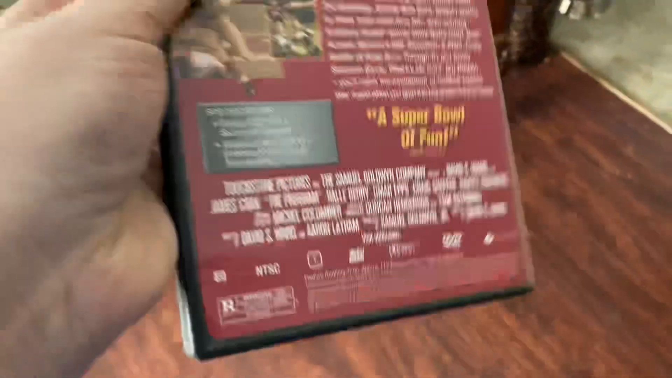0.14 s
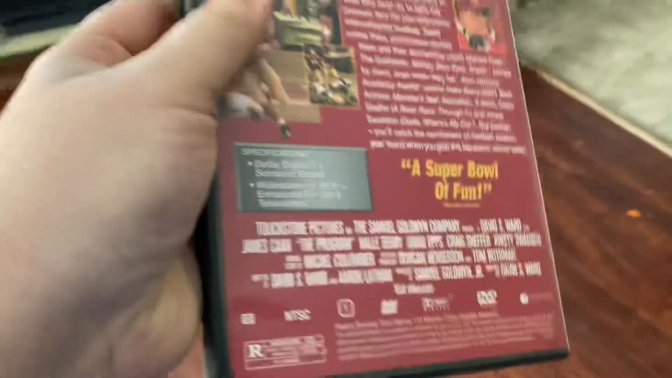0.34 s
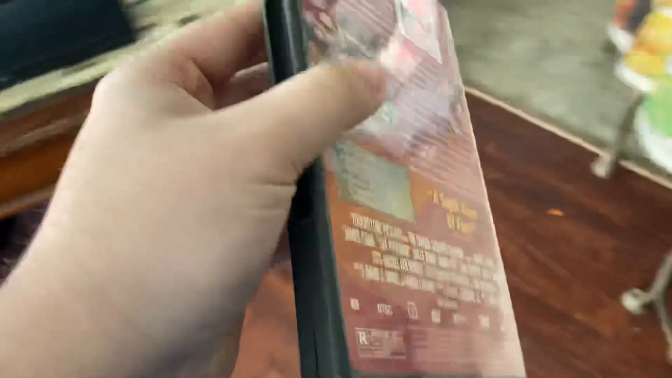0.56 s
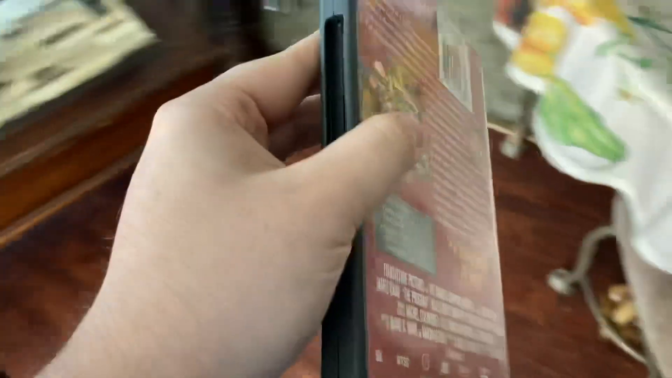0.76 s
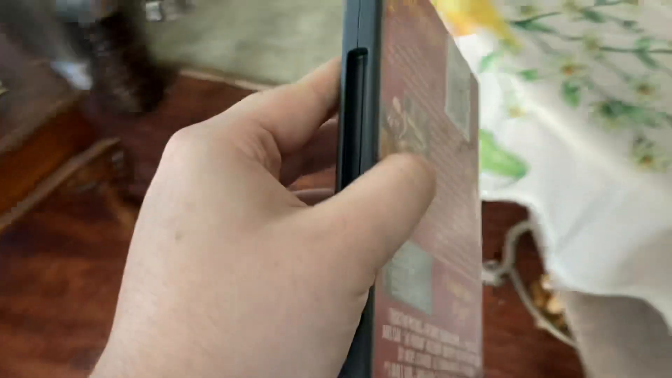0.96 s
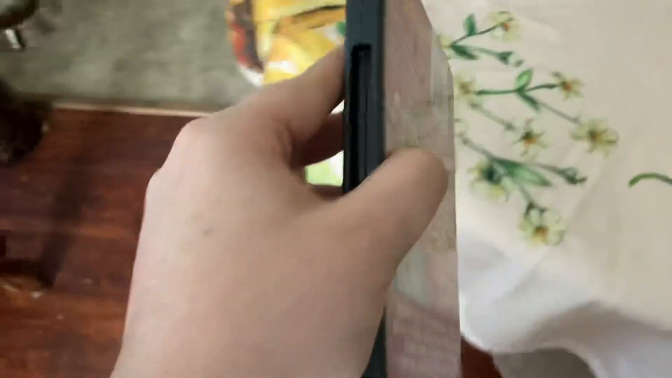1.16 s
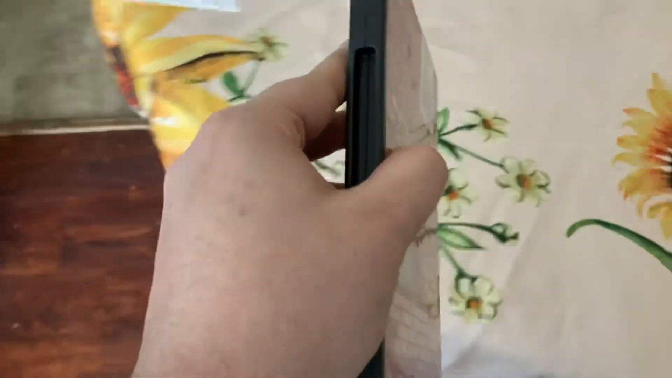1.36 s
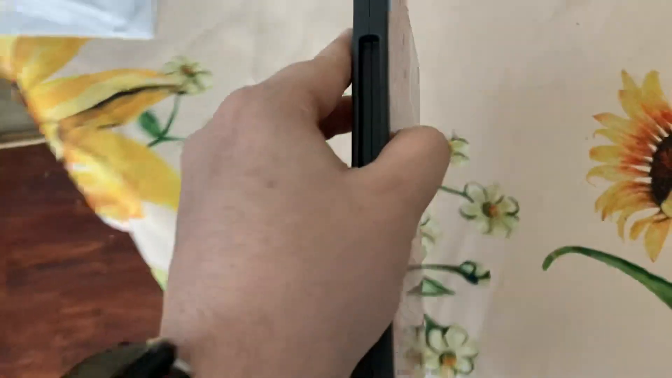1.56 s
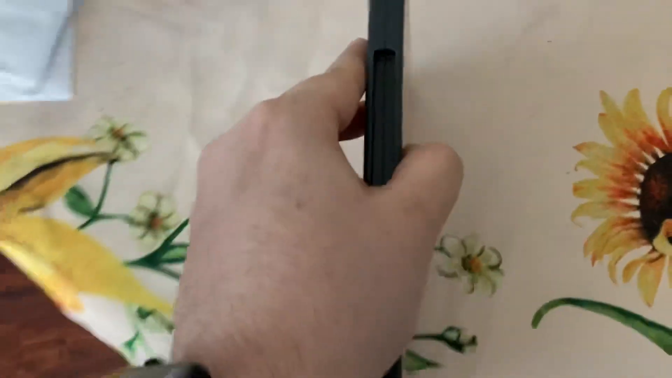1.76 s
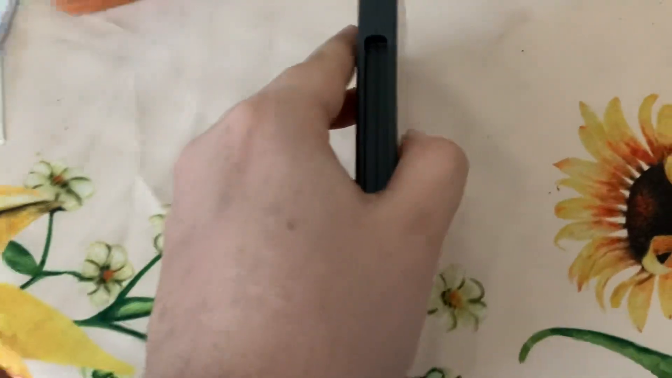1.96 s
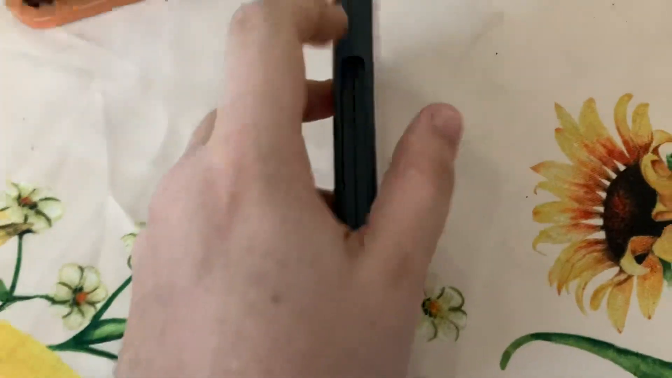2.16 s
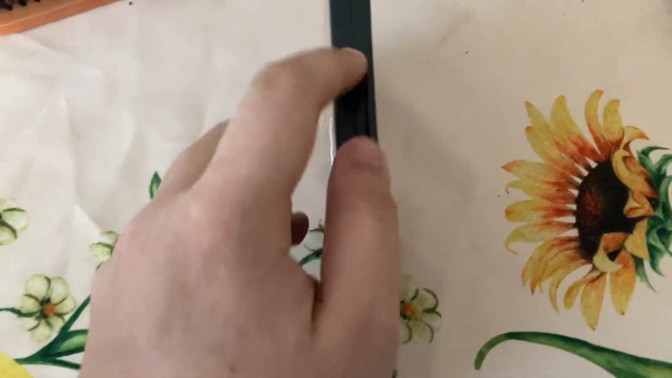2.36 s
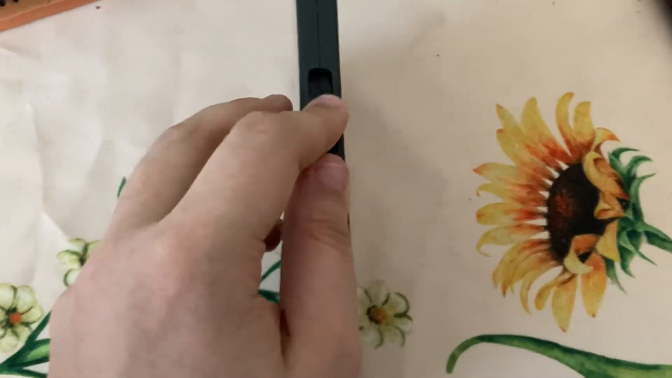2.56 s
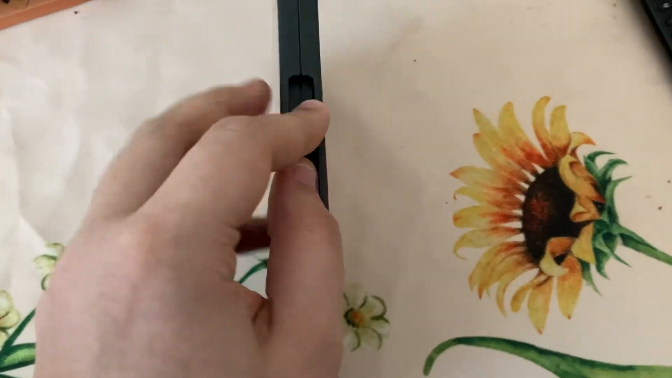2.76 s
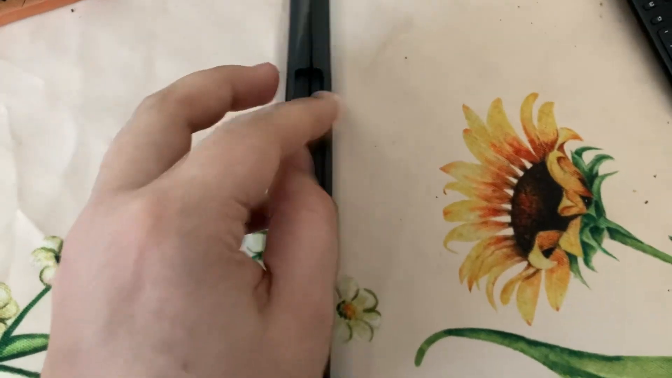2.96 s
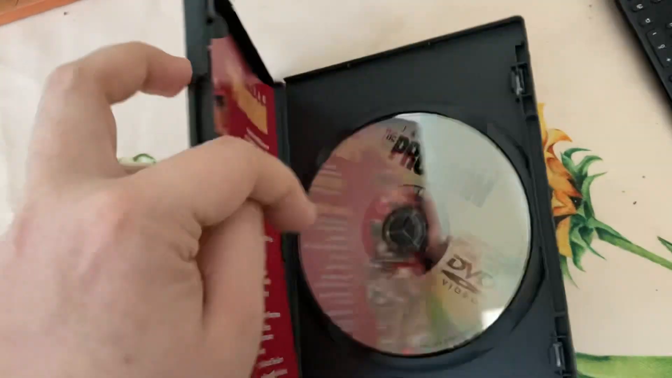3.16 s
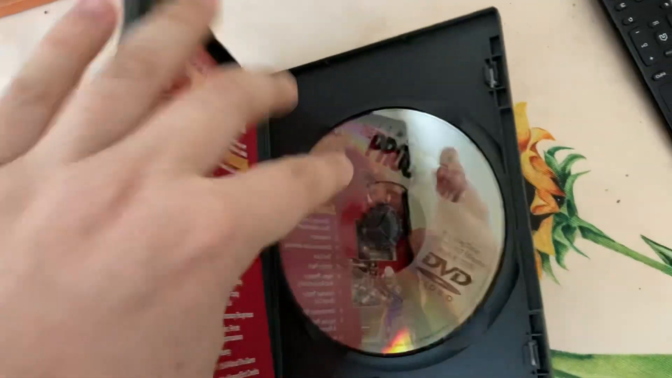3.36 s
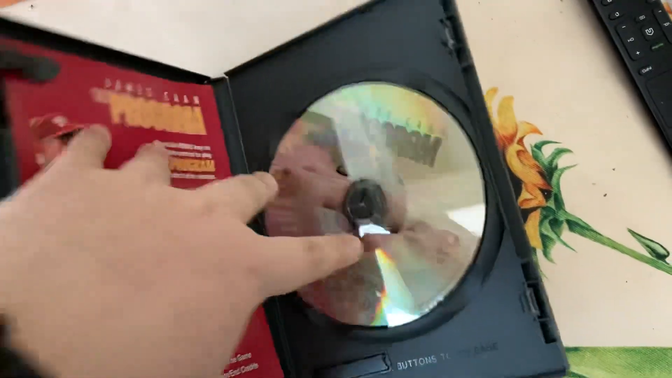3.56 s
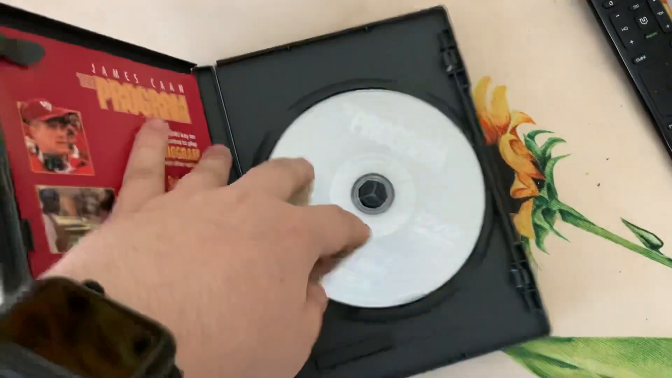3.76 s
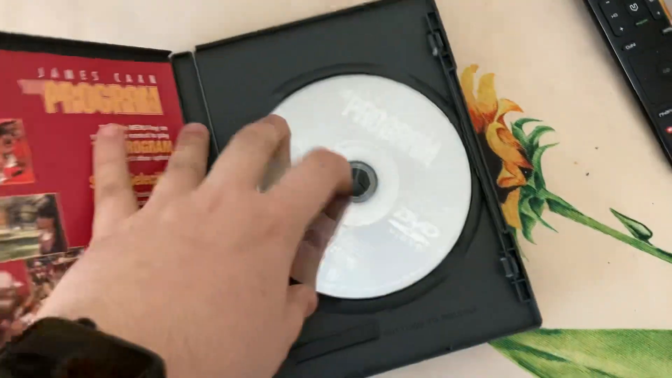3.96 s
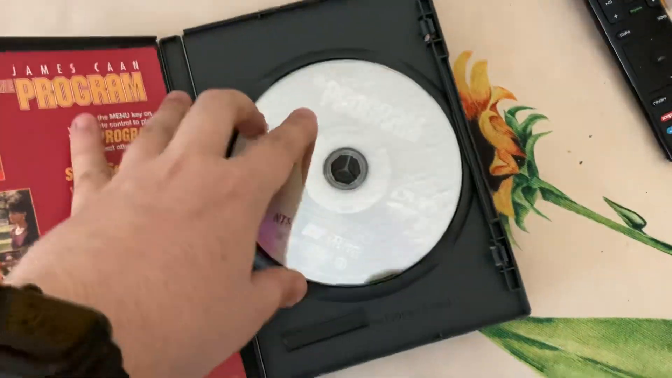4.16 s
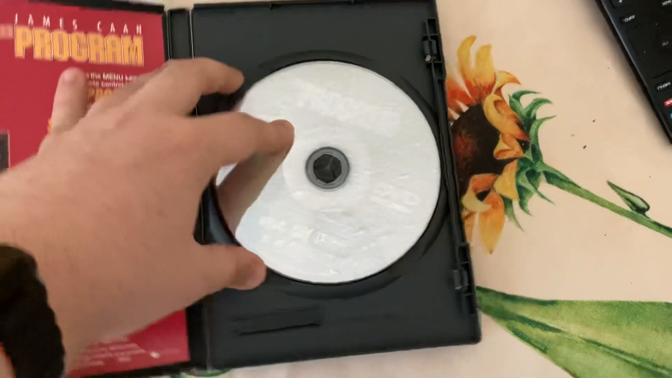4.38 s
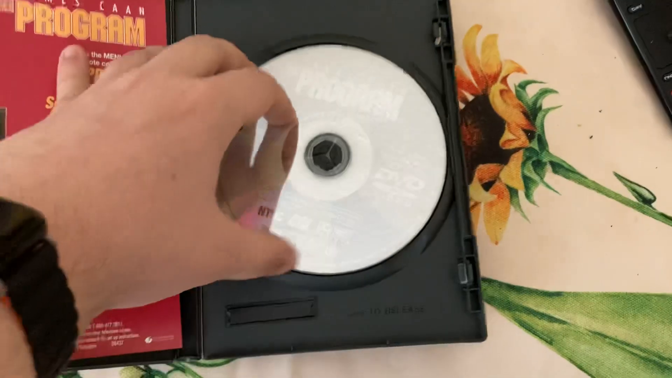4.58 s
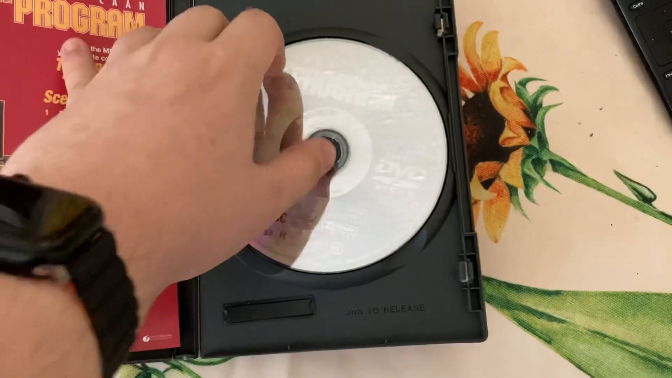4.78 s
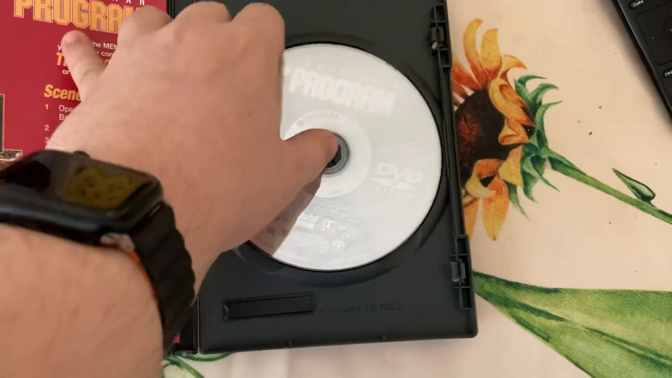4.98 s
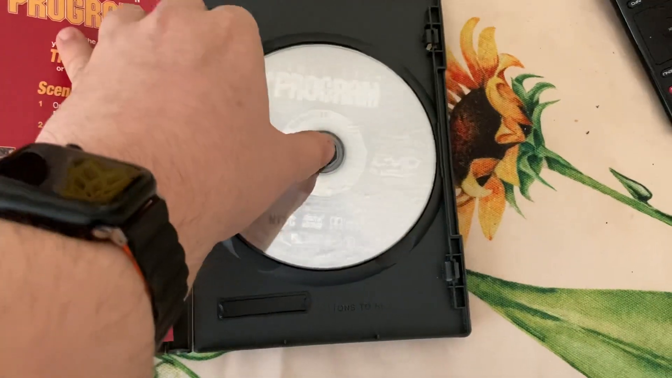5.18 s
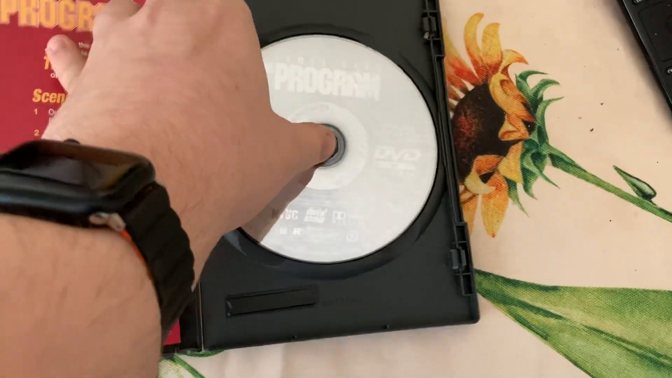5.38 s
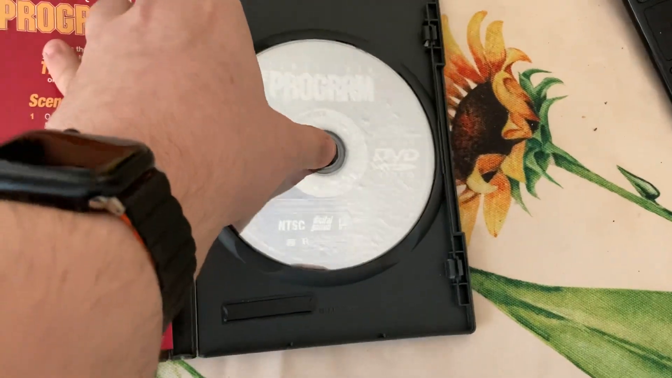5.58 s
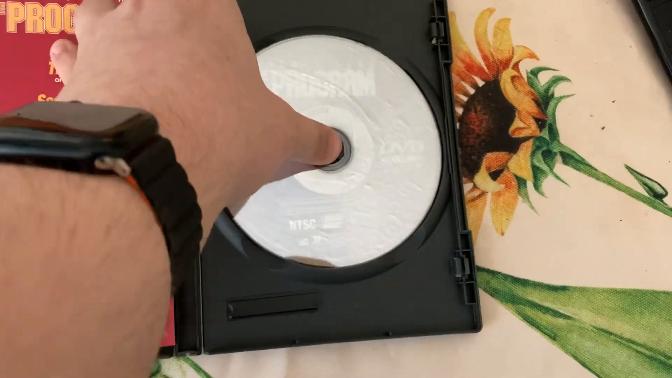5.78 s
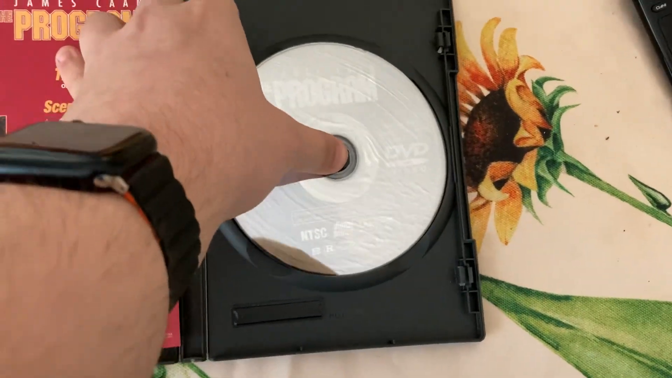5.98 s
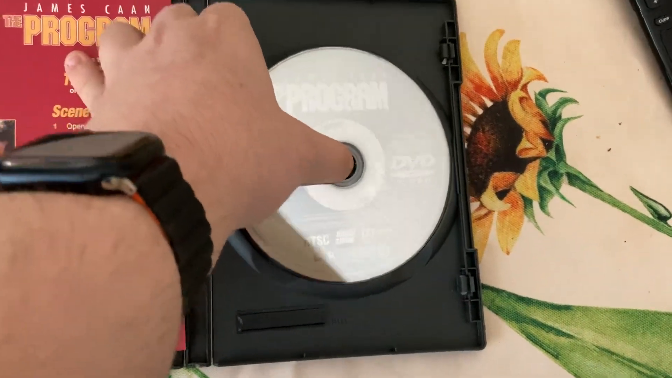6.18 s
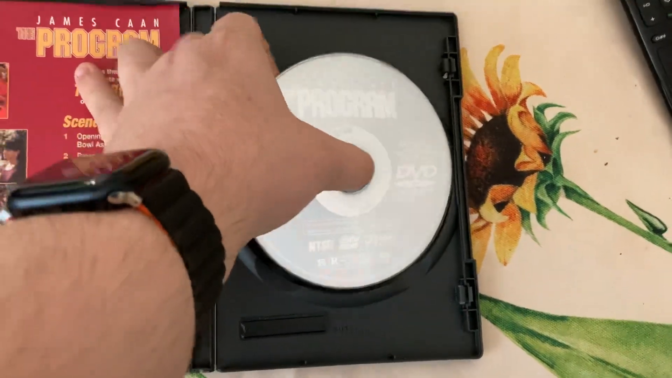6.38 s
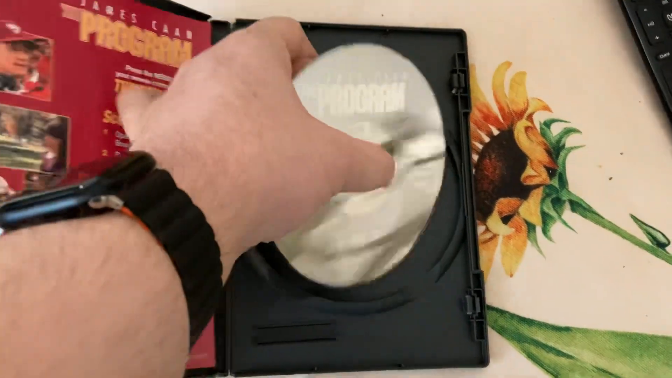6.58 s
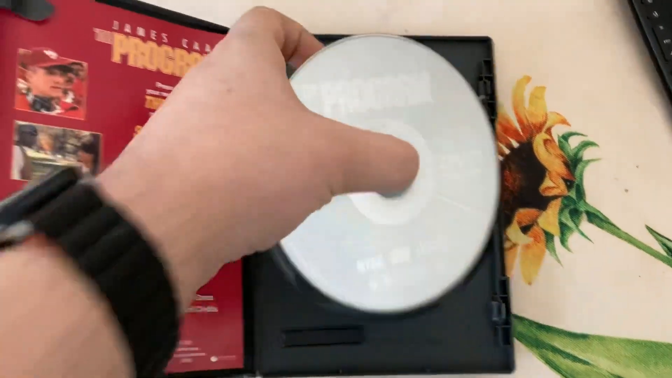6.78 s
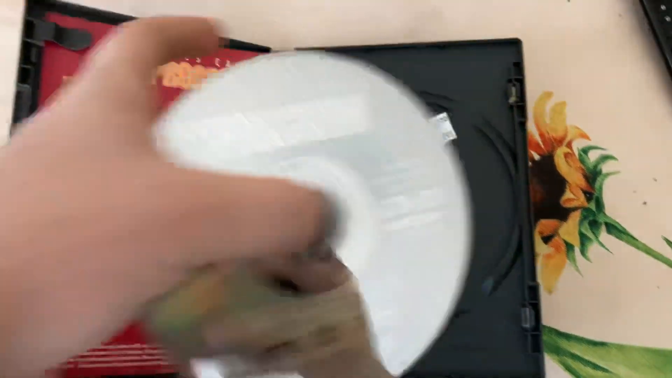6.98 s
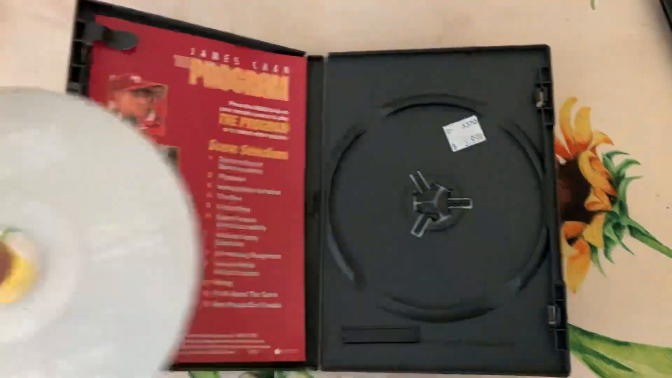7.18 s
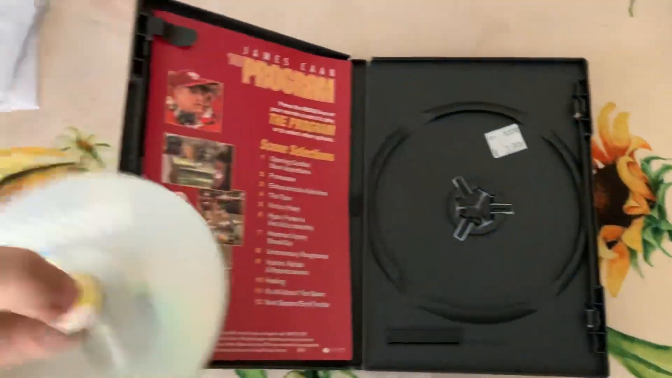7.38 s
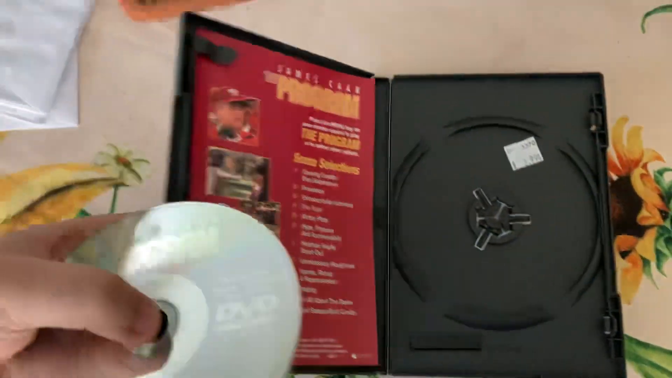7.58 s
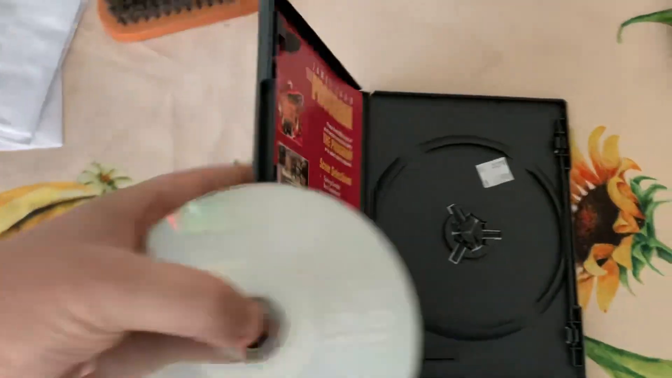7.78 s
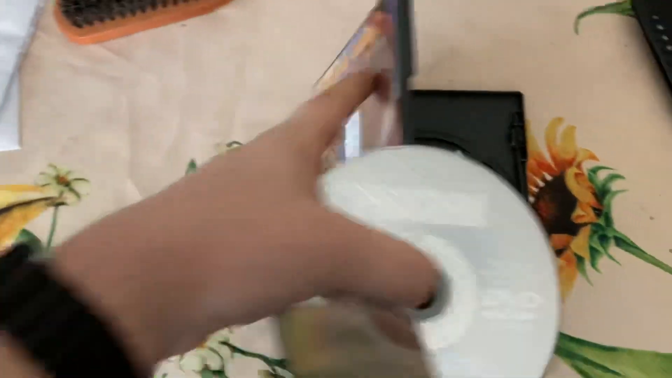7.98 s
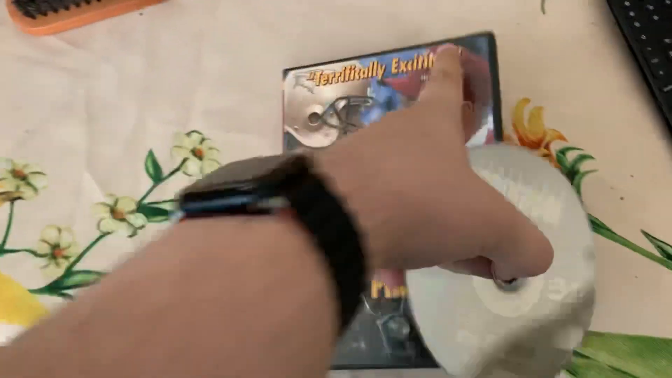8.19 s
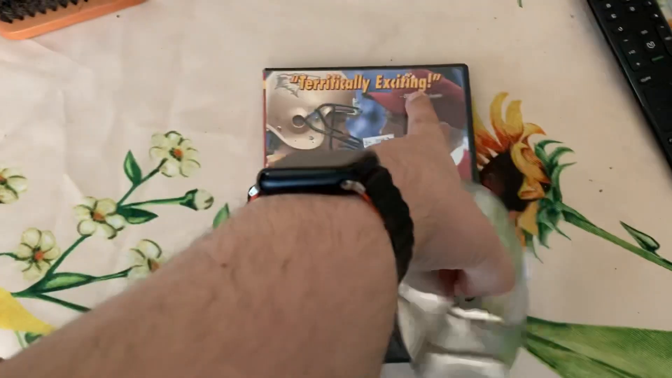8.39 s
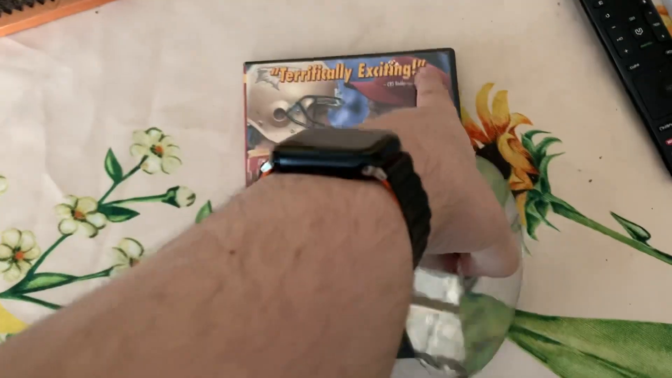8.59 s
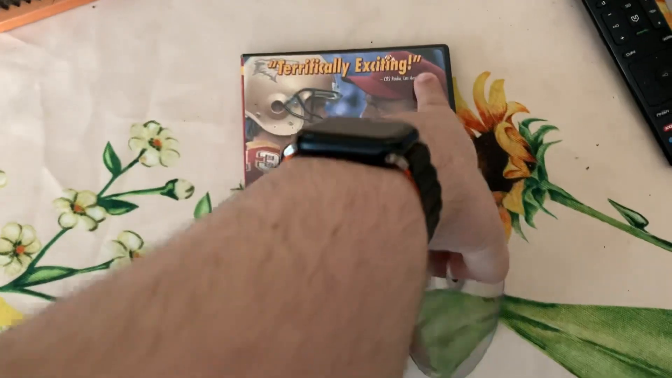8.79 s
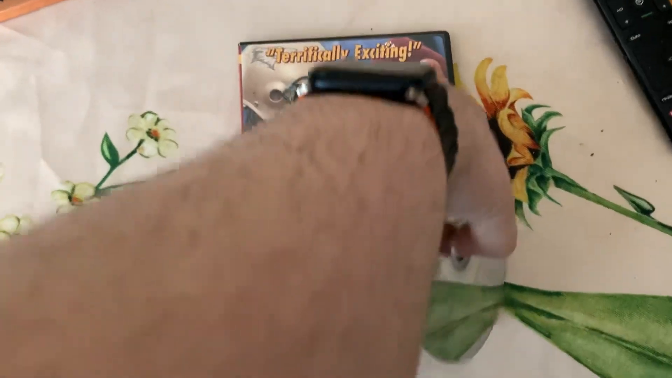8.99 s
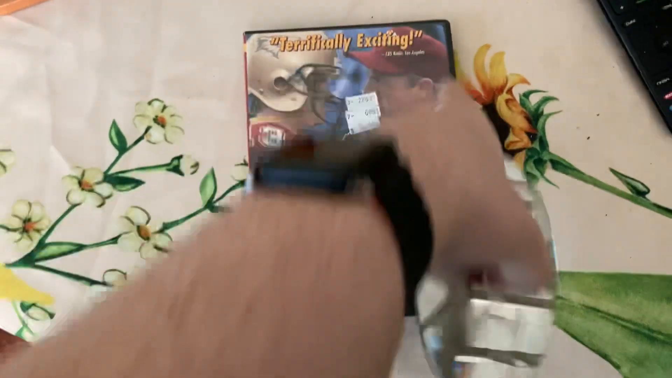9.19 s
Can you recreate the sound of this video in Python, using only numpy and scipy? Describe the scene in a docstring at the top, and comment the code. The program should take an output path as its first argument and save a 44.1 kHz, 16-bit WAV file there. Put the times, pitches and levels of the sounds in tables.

```python
"""A disc case opened and shut

Hands turn a plastic disc case, slide it onto a tablecloth and snap it open in a small, live room.
A thumb presses the hub until its prongs click and the disc springs free; the disc is lifted out,
the lid falls back and is pressed shut with a loud clap. Skin rubs and plastic creaks in between.
Snaps are noise cracks with ringing modes; friction is trains of slips sent through resonances."""
import sys
import numpy as np
from scipy import signal
from scipy.fft import rfft, irfft, next_fast_len
from scipy.io import wavfile
from scipy.ndimage import uniform_filter1d

SR = 44100
rng = np.random.default_rng(int(sys.argv[2]) if len(sys.argv) > 2 else 0)


def unload_wav(signal):
    """Save mono or channel-first audio to the path in sys.argv[1] as 16-bit WAV at rate SR, clipped to [-1, 1]."""
    wavfile.write(
        sys.argv[1],
        SR,
        np.round(np.clip(np.atleast_2d(signal).T, -1, 1) * 32767).astype(np.int16),
    )


N = 407484
TIME = np.arange(N) / SR

# edges of the bands of a blow, in order thump, shell, panel, edge, crack: f/Hz
BLOW_BAND_EDGES = [50, 280, 800, 2400, 6000, 17000]
# resonances of the case: f/Hz, width/Hz, level over the plain plastic/dB
SHELL_MODES = [(442, 50, 14.5), (525, 180, 12.5), (830, 69, 1), (1080, 620, 13.5), (1640, 66, 11.5),
               (1790, 97, 8.5), (2800, 350, 4.5), (4340, 330, 5), (7530, 2000, 3.5), (9800, 4100, 3.5)]
# prongs of the hub slipping past the disc: t/s, crack T60 at 2 kHz/s, part, relative ring level/dB,
# thump f/Hz, thump level/dB, crack level/dB, brightness/(dB per octave)
PRONG_CLICKS = [ (5.7314, .026, "first prong", -33.5, 105.5, -61.5, -40.5, 0.92),
                (5.8084, .017, "second prong", -29.5, 108.8, -46.5, -28.5, 0.56),
                (5.8224, .013, "second prong", -34, 163, -55.5, -32, 1),
                (6.1182, .018, "last prong", -25, 344, -39.5, -29, 0.88)]


def from_db(db):
    """Decibels express the logarithm of an amplitude ratio; this returns the ratio."""
    return 10 ** (np.asarray(db) / 20)


def rms_one(x):
    """Mean-square normalisation: scale a signal to unit power."""
    return x / np.sqrt(np.mean(x ** 2) + 1e-20)


def at_hz(points, hz):
    """Logarithmic frequency scale: interpolate a table along log f."""
    known, values = np.transpose(points)
    return np.interp(np.log(np.maximum(hz, 1)), np.log(known), values)


def band(x, low, high):
    """Causal band-pass filtering between two frequencies."""
    return signal.sosfilt(signal.butter(3, [low, high], "band", fs=SR, output="sos"), x)


def filtered(x, response):
    """Linear filtering: multiply the spectrum by a response given as a function of Hz."""
    size = next_fast_len(N + SR // 10)
    spectrum = rfft(x, size) * response(np.fft.rfftfreq(size, 1 / SR))
    return irfft(spectrum, size)[..., :N]


def coloured(x, spectrum):
    """Spectral shaping: weight noise by a tabulated spectrum, then bring it to unit power."""
    return rms_one(filtered(x, lambda hz: from_db(at_hz(spectrum, hz))))


def resonance(x, hz, width):
    """Damped oscillator: a two-pole resonance with gain 1 at its peak."""
    r = np.exp(-np.pi * width / SR)
    numerator = np.array([1, 0, -1]) * (1 - r * r) / 2
    return signal.lfilter(numerator, [1, -2 * r * np.cos(2 * np.pi * hz / SR), r * r], x)


def body(x, modes):
    """Modal filtering: plastic passes everything and stresses its resonances."""
    return x + sum((from_db(db) - 1) * resonance(x, hz, width) for hz, width, db in modes)


def pair(mid, side, spread):
    """Partial coherence: left and right from a shared and an opposed part."""
    return np.array([mid + spread * side, mid - spread * side])


def add(out, s, sound):
    """Superposition: mix a short sound in at time s."""
    start = round(s * SR)
    out[:, start:start + sound.shape[-1]] += sound[..., :N - start]


def with_energy(x, db):
    """Sound exposure: scale a short sound to an energy level counted over 10 ms."""
    energy = np.mean(np.sum(x ** 2, axis=-1))
    return x * from_db(db) * np.sqrt(SR / 100 / energy)


def ring(t, hz, t60):
    """Free vibration: one mode that decays exponentially, by 60 dB in t60."""
    return np.sin(2 * np.pi * hz * t) * from_db(-60 * t / t60)


def contact(db, colour, brightness):
    """Contact stiffness: levels of shell, panel, edge and crack, tilted about the panel by brightness."""
    centres = np.sqrt(np.multiply(BLOW_BAND_EDGES[1:-1], BLOW_BAND_EDGES[2:]))
    return db + np.array(colour) + brightness * np.log2(centres / centres[1])


def blow(t60, levels, modes, thump_hz, rise_s, thump_cycles, low_linger=0.17, spread=0.79):
    """Impact: dense modes of a thin panel decay as noise, low ones slowest, over a dull thump."""
    crack_softens_hz = 12800
    t = TIME[:SR // 6]
    thump = ring(t, thump_hz, thump_cycles / thump_hz) * (1 - np.exp(-t / 0.036))
    out = with_energy(thump, levels[0])
    softening = signal.butter(2, crack_softens_hz, fs=SR, output="sos")
    for low, high, db in zip(BLOW_BAND_EDGES[1:], BLOW_BAND_EDGES[2:], levels[1:]):
        height = np.sqrt(low * high) / 2000  # band centre relative to 2 kHz
        band_t60 = t60 * height ** -low_linger
        shake = pair(*rng.standard_normal((2, len(t))), spread * min(height, 1))
        shake = shake * (1 - np.exp(-t / rise_s)) * from_db(-60 * t / band_t60) + 1e-18
        shake = body(signal.sosfilt(softening, shake), modes)
        out = out + with_energy(band(shake, low, high), db)
    return out


def snaps(table, modes, colour, rise_s, swell_s, thump_cycles):
    """Impact and free vibration: a crack and a ringing part, returned near and as sent to the room."""
    # modes of each sprung part; the long low one is the table under the case: f/Hz, relative level/dB, T60/s
    part_modes = { "latch": [(153.3, -3, 0.22), (640, -1.5, 0.022), (1046, -6.5, 0.33), (1710, -0.5, 0.045),
                  (2040, -10.5, .02), (2900, -6, 0.038), (3908, -9.5, 0.013), (4338, -7.5, .012),
                  (4830, -6, 0.0077)], "rim": [(640, -12.5, 0.013), (1137, -5.5, 0.025), (1560, -2, 0.022),
                  (1890, -6.5, 0.03), (2900, -10.5, 0.019), (3838, -9.5, .014), (4260, -8.5, .014),
                  (7353, -12.5, .012)], "hinge": [(1046, -2.5, 0.031), (2630, 0.5, 0.011),
                  (4080, -14, 0.027), (5030, -15, 0.026), (7840, -15, 0.016)], "catch": [(728, -3, .03),
                  (1832, -1, 0.029), (2652, -5.5, 0.021), (3170, 1.5, 0.015), (3890, -7.5, 0.0058),
                  (4670, -6.5, .008), (9240, -9, .02)], "loose lid": [(513, -5.5, 0.017), (770, 2.5, 0.017),
                  (1100, -7.5, .012), (1750, -7.5, .006), (2624, -15, .007), (4100, -17.5, 0.0091)],
                  "lid": [(567, -9.5, 0.016), (822, -0.5, 0.018), (1061, -3, 0.0089), (1970, -6, 0.0067),
                  (2760, -6, 0.0065), (3210, -15.5, 0.006), (8100, -11, 0.0035)], "tray": [(1280, 0, .045),
                  (1674, -1.5, .032), (2676, 0, .04), (4400, -13.5, .02)],
                  "first prong": [(1490, -3.5, 0.022), (3050, 2, .02), (3360, -2, .018), (4620, -3, 0.03),
                  (5113, -12, .025)], "second prong": [(149, -27.5, 0.44), (580, -5.5, 0.012),
                  (1320, 1.5, 0.015), (1670, 1, 0.0096), (3050, -2, 0.022), (4950, -15.5, .4),
                  (6900, -5.5, 0.013), (7410, -3, 0.02), (8450, 1, 0.013), (11385, 0, 0.005)],
                  "last prong": [(150, -21.5, .4), (400, -18, .22), (1300, -8, 0.0069), (2580, -7, 0.012),
                  (3050, -4, 0.014), (4275, 3, 0.013), (4330, -13, 0.45), (6140, -8, 0.012),
                  (6620, -10, .014), (9450, -1.5, .012)]}
    # how freely each part sounds into the room, the flat lid being muffled by the table: level/dB
    part_sends = {"latch": 0, "rim": -1, "hinge": -1.5, "catch": -0.5, "loose lid": -3.5, "lid": -1.5,
                  "tray": 0, "first prong": -0.5, "second prong": -1.5, "last prong": 0}
    # the parts ring close to the microphones; mostly the broad crack fills the room
    ring_room_db, crack_room_db = -7, 1.5
    near, sent = np.zeros((2, N)), np.zeros((2, N))
    t = TIME[:SR // 3]
    for s, t60, part, ring_db, thump_hz, thump_db, db, brightness in table:
        levels = [thump_db, *contact(db, colour, brightness)]
        crack = blow(t60, levels, modes, thump_hz, rise_s, thump_cycles)
        ringing = np.zeros(len(t))
        for k, (hz, mode_db, mode_t60) in enumerate(part_modes[part]):
            tilt_db = brightness * np.log2(hz / 1400)
            mode = (-1) ** k * ring(t, hz, mode_t60) * (1 - np.exp(-t / swell_s))
            ringing += with_energy(mode, ring_db + mode_db + tilt_db)
        for sound, room_db in (crack, crack_room_db), (ringing, ring_room_db):
            add(near, s, sound)
            add(sent, s, from_db(room_db + part_sends[part]) * sound)
    return np.array([near, sent])


def taps(contacts, t60, rise_s, thump_cycles):
    """Soft impact: light knocks on the case."""
    out = np.zeros((2, N))
    for s, thump_hz, *levels in contacts:
        add(out, s, blow(t60, levels, SHELL_MODES, thump_hz, rise_s, thump_cycles))
    return out


def slips(per_s, uneven_db, smooth, spread):
    """Random stick-slip friction: tiny clicks of uneven size over a smooth rub."""
    sizes = from_db(uneven_db * np.minimum(rng.exponential(1, N), 3))
    clicks = rms_one((rng.random(N) < per_s / SR) * sizes)
    signs = rng.choice([-1, 1], (2, N))
    return pair(*(clicks * signs + smooth * rng.standard_normal((2, N))), spread)


def stick_slip(per_s, jitter, uneven_db, smooth, spread):
    """Relaxation oscillation: a contact loads and slips in a loosely regular train over a faint rub."""
    draws = rng.standard_normal((8000, 2))
    times = np.cumsum(np.exp(jitter * draws[:, 0])) / per_s
    heard = times < TIME[-1]
    clicks = np.zeros(N)
    clicks[(times[heard] * SR).astype(int)] = from_db(uneven_db * np.clip(draws[heard, 1], -2, 2))
    signs = rng.choice([-1, 1], (2, N))
    return pair(*(rms_one(clicks) * signs + smooth * rng.standard_normal((2, N))), spread)


def stutter(per_s, depth_db):
    """Intermittent contact: catching and letting go at random, as an uneven gain of unit power."""
    catches = from_db(depth_db * np.clip(rng.standard_normal(4000), -2, 2))
    return rms_one(np.interp(TIME * per_s, np.arange(len(catches)), catches))


def gripped(x, modes):
    """Variable damping: moving fingers damp and free each resonance, so the colour keeps shifting."""
    out = x
    for hz, width, db in modes:
        out = out + (from_db(db) - 1) * stutter(per_s=22, depth_db=7) * resonance(x, hz, width)
    return out


def shove(s, length, fade):
    """Frictional braking: the motion starts with a jerk, loses speed, then coasts to rest."""
    jerk_s, coast_db_per_s = .005, 261
    t = TIME - s
    slowing_db = fade * np.clip(t, 0, length)
    coasting_db = coast_db_per_s * np.clip(t - length, 0, 1)
    return np.clip(t / jerk_s + 1, 0, 1) * from_db(-slowing_db - coasting_db)


def rub(middle, length):
    """Speed-dependent friction: one smooth swell of speed."""
    ebb_db, ebb_power = 18.5, 1.9  # drop at the nominal ends, and the power of time it follows
    away = 2 * np.abs(TIME - middle) / length
    gain = np.zeros(N)
    moving = away < 3
    gain[moving] = from_db(-ebb_db * away[moving] ** ebb_power)
    return gain


def ambience(spread=0.93):
    """Background noise: quiet indoor rumble, and a faint hum as narrow-band resonance."""
    # spectrum of the rumble: f/Hz, relative level per Hz/dB
    rumble_spectrum = [(25, -6.5), (55, 0), (100, 2), (160, -12), (350, -15.5), (700, -26), (1500, -33.5),
                       (5000, -39.5), (16000, -42)]
    rumble_db, hum_hz, hum_db = -63.5, 81.6, -76.5
    rumble = coloured(pair(*rng.standard_normal((2, N)), spread), rumble_spectrum)
    hum = rms_one(resonance(resonance(rng.standard_normal(N), hum_hz, 1.9), hum_hz, 1.9))
    return from_db(rumble_db) * rumble + from_db(hum_db) * hum


def stroke_gains():
    """Speed-dependent friction: gains of hissing, sliding and creaking for all shoves and rubs."""
    # shoves: t/s, length/s, fade/(dB per s), relative hissing, sliding and creaking level/dB
    shove_table = [(0.06, 0.069, 27, -52.5, -54, -61), (0.282, 0.3, 18, -56.5, -51.5, -59.5),
                   (0.927, 0.19, 93, -57.5, -51, -58), (1.475, 0.092, 39, -46, -35, -65),
                   (1.787, 0.16, 33, -43.5, -53.5, -62), (3.455, 0.22, 99, -44, -51.5, -65),
                   (3.696, 0.43, 57, -58.5, -68, -74), (8.182, 0.056, 56, -85, -68.5, -75)]
    # finger rubs: middle t/s, length/s, relative hissing, sliding and creaking level/dB
    rub_table = [(0.222, 0.34, -65, -69, -70), (0.498, 0.22, -64, -62, -57.5),
                 (0.633, 0.38, -94, -66.5, -71), (1.192, 0.21, -62, -55.5, -69.5),
                 (2.369, 0.15, -61, -59.5, -75), (2.51, 0.12, -59.5, -62, -75.5),
                 (2.715, 0.087, -66, -60, -67.5), (2.832, 0.055, -59, -65, -76.5),
                 (2.987, 0.086, -52.5, -47.5, -66.5), (3.226, 0.117, -54, -81, -59),
                 (3.41, 0.14, -64, -64.5, -58.5), (4.278, 0.1, -56.5, -53.5, -56),
                 (4.369, 0.26, -55.5, -54.5, -56), (4.558, 0.16, -67, -68, -65),
                 (4.774, .07, -75.5, -72, -74), (4.938, 0.13, -73.5, -75.5, -53.5),
                 (5.01, .09, -82, -71, -53), (5.099, 0.15, -66, -72, -67.5),
                 (5.382, 0.26, -63.5, -62, -59.5), (5.491, 0.14, -60, -63.5, -61),
                 (5.621, 0.069, -69, -82.5, -80.5), (6.393, 0.15, -65, -69.5, -59.5),
                 (6.432, 0.023, -51, -46, -58), (6.483, 0.11, -64, -61.5, -59),
                 (6.603, 0.13, -68, -85, -80), (6.98, .4, -103.5, -78.5, -82),
                 (7.802, 0.24, -69.5, -98, -100), (7.948, 0.35, -69.5, -99.5, -100),
                 (8.37, 0.26, -77, -72, -75), (8.513, 0.047, -71.5, -89, -90.5)]
    gains = np.zeros((3, N))
    for s, length, fade, *levels in shove_table:
        gains += np.outer(from_db(levels), shove(s, length, fade))
    for middle, length, *levels in rub_table:
        gains = np.maximum(gains, np.outer(from_db(levels), rub(middle, length)))
    return gains


def hands(slide_db=-4.0, creak_db=-3.0, handling_db=-6.5):
    """Friction: the sleeve hisses on cloth, skin slides, flexed panels creak, the grip bumps the shell."""
    # spectra of the four sounds: f/Hz, relative level per Hz/dB
    hiss_spectrum = [(900, -25.5), (1600, -7.5), (2300, -21.5), (3100, -23), (4400, -7), (6000, -9),
                     (7500, -2), (11000, 1.5), (13000, -2), (15500, -11)]
    slide_spectrum = [(400, -13.5), (1500, -13.5), (2800, 1.5), (4200, 4.5), (6000, 0.5), (9000, -7),
                      (15500, -25)]
    creak_spectrum = [(400, -31), (800, -10.5), (1200, 4), (1900, 2), (2400, 0), (3000, -10), (4400, -16.5),
                      (9000, -29)]
    bump_spectrum = [(40, -12.5), (90, 0), (210, 6.5), (300, 3), (440, -8.5), (620, -5.5), (900, -15),
                     (2000, -31.5)]
    # resonances of the flexed panel: f/Hz, width/Hz, level over the plain plastic/dB
    panel_modes = [(1220, 150, 7.5), (1630, 150, 6.5), (2020, 340, 4), (2686, 93, 3), (7200, 400, 8)]
    # how hard the hands work the shell: t/s, relative level/dB
    grip_course = [(0, -49), (.5, -53), (.8, -63.5), (1.4, -64.5), (1.55, -59), (1.95, -56.5), (2.15, -74),
                   (2.9, -70), (3.7, -62.5), (4.1, -58.5), (4.4, -69), (5.0, -69), (5.6, -76.5),
                   (6.45, -69.5), (6.8, -74), (8.3, -72.5)]

    hissing, sliding, creaking = stroke_gains()
    hiss = coloured(slips(per_s=3000, uneven_db=1.5, smooth=1.2, spread=1.0), hiss_spectrum)
    skin = slips(per_s=710, uneven_db=1, smooth=0.79, spread=0.61)
    slide = coloured(gripped(skin, SHELL_MODES), slide_spectrum)
    grit = stick_slip(per_s=230, jitter=.6, uneven_db=3.5, smooth=.35, spread=.6)
    creak = coloured(gripped(grit, panel_modes), creak_spectrum)
    nudges = slips(per_s=260, uneven_db=1.5, smooth=.6, spread=.9) * stutter(per_s=32, depth_db=3)
    bumps = coloured(body(nudges, SHELL_MODES), bump_spectrum)

    rubbing = hissing * hiss + from_db(slide_db) * sliding * slide
    rubbing = rubbing * stutter(per_s=68, depth_db=1.5)
    grip = from_db(handling_db + np.interp(TIME, *np.transpose(grip_course)))
    return rubbing + from_db(creak_db) * creaking * creak + grip * bumps


def fingers(tick_db=-4.0):
    """Contact stiffness: soft pads thump dully on the shell; hard plastic ticks and rings the tray."""
    # soft finger pads landing on the shell: t/s, thump f/Hz, thump level/dB, knock level/dB
    pad_table = [(0.049, 115, -55, -47.5), (.094, 172, -52.5, -69), (.176, 300, -63, -62),
                 (0.211, 85, -44, -56.5), (.222, 230, -52.5, -72), (.448, 260, -59, -62),
                 (0.48, 237, -47.5, -52.5), (.516, 230, -54, -57), (.637, 236, -59, -57.5),
                 (0.698, 123, -57, -64), (.727, 240, -62, -65), (0.824, 300, -62, -68),
                 (0.869, 224, -61, -70), (0.921, 261, -58, -66), (1.019, 326, -61, -59.5),
                 (1.043, 146, -60, -60), (1.203, 300, -71, -58), (1.305, 97, -60, -66),
                 (1.474, 396, -44.5, -48.5), (1.789, 125, -43.5, -42), (1.815, 100, -46.5, -50.5),
                 (2.684, 200, -72, -60.5), (2.71, 140, -73.5, -56.5), (3.648, 101, -50, -53),
                 (3.738, 106.2, -60.5, -57.5), (7.564, 63.33, -48.5, -69.5), (8.204, 151, -77, -62.5)]
    # a pad is dull; relative level/dB of shell, panel, edge, crack
    pad_colour = [-1, -16, -13, -18.5]
    # disc and plastic parts ticking together: t/s, relative level/dB, brightness/(dB per octave)
    tick_table = [(0.013, -64, 4), (0.0508, -58, -4), (0.793, -75, -1), (1.577, -50.5, -8),
                  (1.762, -74, 12), (2.708, -56.5, 2), (3.075, -55.5, 7), (3.14, -59.5, 7),
                  (3.362, -57.5, 0), (3.741, -59, -1), (3.82, -54.5, 3), (3.8325, -59, 4),
                  (3.8845, -52.5, -2), (3.903, -58.5, -1), (3.9228, -43, -1.5), (3.956, -53.5, 1.5),
                  (4.003, -66, -2.5), (4.0498, -55.5, -3.5), (4.1535, -67.5, 4.5), (4.563, -60.5, 2),
                  (4.6245, -66.5, 2), (4.7065, -64, -5), (4.774, -68, 4), (5.198, -74.5, 1),
                  (5.3308, -51, 2), (5.397, -55.5, -3.5), (5.413, -53.5, -3), (5.4233, -48, 3.5),
                  (6.011, -53, 2), (6.381, -57, -8), (6.432, -54.5, 6.5), (6.479, -50, -2),
                  (6.5694, -60.5, -7), (6.616, -58, -13), (7.547, -63, -3.5), (7.685, -78, 6.5),
                  (8.184, -73.5, 7.5), (8.326, -78, 9.5), (9.083, -58, 6.5)]
    # a tick sounds mainly in the panel; relative level/dB of shell, panel, edge, crack
    tick_colour = [-23, -0.5, -5, -12]
    ring_db, thump_db = -4.5, -15  # relative to the tick
    t60, thump_hz = 0.046, 110

    pads = [(s, hz, low_db, *contact(db, pad_colour, 0)) for s, hz, low_db, db in pad_table]
    padding = taps(pads, t60=0.06, rise_s=0.0007, thump_cycles=4.3)
    ticks = [(s, t60, "tray", db + ring_db, thump_hz, db + thump_db, db, brightness)
             for s, db, brightness in tick_table]
    near, _ = snaps(ticks, SHELL_MODES, tick_colour, rise_s=.0004, swell_s=.0004, thump_cycles=5)
    return padding + from_db(tick_db) * near


def scuffs():
    """Dense stick-slip: plastic edges scuff past each other in short bursts that drive the shell."""
    # scuffs: middle t/s, length/s, level/dB
    scuff_table = [(0.487, 0.095, -58.5), (3.067, 0.02, -41), (3.119, 0.016, -49), (3.207, 0.029, -49.5),
                   (3.37, 0.033, -57.5), (3.409, 0.025, -55), (3.475, 0.063, -46), (3.527, 0.029, -46),
                   (3.627, 0.015, -38), (5.805, .012, -37), (6.361, 0.034, -58), (8.874, 0.024, -27.5)]
    # their spectrum: f/Hz, relative level per Hz/dB
    scuff_spectrum = [(300, -23), (700, -2.5), (1100, -4), (1900, -2), (3000, -2.5), (7000, -14.5),
                      (15000, -25)]
    grit = slips(per_s=1500, uneven_db=1.5, smooth=.6, spread=.4)
    scrape = coloured(body(grit, SHELL_MODES), scuff_spectrum)
    return scrape * sum(from_db(db) * rub(middle, length) for middle, length, db in scuff_table)


def latch_squeak():
    """Stick-slip at a steady pitch: the strained latch squeaks unevenly just before it gives."""
    # the squeak: middle t/s, length/s, f/Hz, level/dB
    middle, length, hz, db = (2.983, .03, 684, -38)
    swell = rub(middle, length) * stutter(per_s=250, depth_db=3)
    return from_db(db) * swell * np.sin(2 * np.pi * hz * TIME)


def case_snaps():
    """Release of elastic strain: latches, hinge and lid snap and ring."""
    # blows of the case: t/s, crack T60 at 2 kHz/s, part, relative ring level/dB,
    # thump f/Hz, thump level/dB, crack level/dB, brightness/(dB per octave)
    blow_table = [ (2.9878, 0.038, "latch", -27, 407.5, -25.5, -22, 0.8),
                  (2.9960, .018, "rim", -18, 125, -39, -20.5, -1.2),
                  (3.0012, .022, "rim", -28, 150, -33, -25.5, 2),
                  (3.2205, 0.018, "catch", -55, 108, -69, -54, 0),
                  (3.4595, 0.023, "rim", -44, 130, -61, -69, -3),
                  (3.530, 0.027, "rim", -54.5, 130, -69, -51.5, -2),
                  (3.6305, 0.036, "hinge", -35, 133, -47, -37.5, 2.5),
                  (3.6728, .02, "hinge", -52, 110, -66, -49.5, 2),
                  (3.7175, .025, "hinge", -52, 110, -57, -45, 1),
                  (8.3960, 0.0091, "loose lid", -43.5, 330, -50.5, -40, -4),
                  (8.4060, 0.03, "loose lid", -49, 149, -53, -58, -1.5),
                  (8.4105, .014, "loose lid", -55.5, 405, -56, -60.5, -10.5),
                  (8.5948, 0.025, "catch", -50, 109.8, -66.5, -45, 0.5),
                  (8.6602, 0.013, "loose lid", -45.5, 380, -50.5, -39, -5),
                  (8.6700, .016, "loose lid", -55, 160, -71, -46.5, -4.5),
                  (8.6944, 0.021, "catch", -43.5, 146, -58, -42.5, 2),
                  (8.8735, .004, "catch", -37, 240, -60, -41, 5.5),
                  (8.8742, 0.0062, "lid", -18.5, 239, -49.5, -15.5, -0.9),
                  (8.8785, 0.023, "lid", -29.5, 306.5, -25, -28.5, -3),
                  (8.8885, 0.026, "lid", -43.5, 420, -47, -40, -4),
                  (8.9015, .02, "lid", -47, 355, -52, -42.5, -1)]
    # relative level/dB of shell, panel, edge, crack
    case_colour = [-9, -3.5, -7, -5]
    return snaps(blow_table, SHELL_MODES, case_colour, rise_s=.0008, swell_s=.0007, thump_cycles=4)


def air_puff():
    """Volume displacement: the shells spring apart and push air past the microphones in slow swings."""
    # the puff: t/s, f/Hz, T60 of its decay/s, level/dB, delay on the right/s
    s, hz, t60, db, lag = (3.0025, 108, .021, -20, .0011)
    t = np.maximum(TIME - s - np.array([[0], [lag]]), 0)
    return with_energy(t ** 2 * ring(t, hz, t60), db)


def hub_clicks():
    """Release of elastic strain: the hub's prongs click as they slip past the disc."""
    # resonances of the hub: f/Hz, width/Hz, level over the plain plastic/dB
    hub_modes = [(550, 150, 26), (1377, 630, 11), (1660, 350, 5.8), (3355, 380, 4.1), (3600, 170, 8.8),
                 (4435, 600, 2.4), (4770, 37, 15), (6740, 110, 2.3), (7514, 110, 2.6), (11300, 4700, 4)]
    # relative level/dB of shell, panel, edge, crack
    hub_colour = [-9.5, -4, 0, 3]
    return snaps(PRONG_CLICKS, hub_modes, hub_colour, rise_s=.0009, swell_s=.0008, thump_cycles=4)


def freed_disc(buzz_db=-36, t60=0.45):
    """Chatter excites plate modes: after the last prong lets go, the disc buzzes and dies away."""
    # clusters of disc modes: f/Hz, width/Hz, relative level/dB
    disc_modes = [(2980, 900, -13), (4100, 260, 3), (4500, 370, -1.5), (5100, 500, -8), (6470, 1600, -15)]
    chatter = slips(per_s=900, uneven_db=2, smooth=.5, spread=.9)
    buzz = rms_one(sum(from_db(db) * resonance(resonance(chatter, hz, width), hz, width)
                       for hz, width, db in disc_modes))
    t = TIME - PRONG_CLICKS[-1][0]
    decay = (t > 0) * from_db(buzz_db - 60 * np.abs(t) / t60)
    return buzz * stutter(per_s=40, depth_db=-0.5) * decay


def disc_drag():
    """Stick-slip excitation: the rim drags ever harder and sounds disc and tray until it comes free."""
    # the drag: start t/s, free t/s, growth/(dB per s), level/dB, release/s
    start_s, free_s, growth, db, release_s = (6.435, 6.526, 50, -48.5, .014)
    # resonances of disc and tray: f/Hz, width/Hz, relative level/dB
    drag_modes = [(932, 109, 3.5), (1322, 144, 4), (1550, 193, 3.5), (1787, 270, 2), (2330, 720, -3),
                  (3780, 200, -5.5), (4560, 180, -7), (7350, 1400, -16)]
    grit = stick_slip(per_s=260, jitter=.5, uneven_db=3, smooth=.2, spread=.5)
    sound = sum(from_db(mode_db) * resonance(resonance(grit, hz, width), hz, width)
                for hz, width, mode_db in drag_modes)
    onset = np.clip((TIME - start_s) / (2 * release_s), 0, 1)
    release = np.clip(1 + (free_s - TIME) / release_s, 0, 1)
    pressure = from_db(-growth * np.abs(TIME - free_s)) * onset * release
    return from_db(db) * pressure * rms_one(sound)


def evened(x, size=70):
    """Spectral whitening: level the narrow peaks of a dying noise, so no pitch stands out."""
    spectrum = rfft(x)
    local_power = uniform_filter1d(np.abs(spectrum) ** 2, size)
    flat = irfft(spectrum / np.sqrt(local_power), x.shape[-1])
    return flat * np.minimum(np.linspace(4, -1, x.shape[-1]), 1).clip(0)  # fade out the end


def room(x, first_echo_s=0.00098, build_s=0.002):
    """Diffuse reverberation: largely independent echoes on the two sides, decaying band by band."""
    # decay before the tails are cut short: f/Hz, T60/s
    decay_times = [(100, 0.54), (400, 0.63), (1200, 0.64), (4000, 0.61), (8000, 0.24), (15000, 0.66)]
    # strength of the echoes: f/Hz, level/dB
    echo_levels = [(80, -12), (135, -9.5), (255, -13), (490, -7.5), (1100, -7.5), (4000, -9.5),
                   (8000, -13.5), (15000, -26.5)]
    tail_cut_s = 0.24  # tails are cut short around this time, as by a noise gate
    t = TIME[:SR]
    edges = np.geomspace(50, 18000, 10)
    response = np.zeros((2, SR))
    for low, high in zip(edges, edges[1:]):
        hz = np.sqrt(low * high)
        onset = np.clip((t - first_echo_s) / build_s, 0, 1)
        fade = from_db(-60 * t / at_hz(decay_times, hz)) * onset
        fade = fade * np.exp(-(t / tail_cut_s) ** 4) + 1e-18
        echoes = pair(*evened(rng.standard_normal((2, SR)) * fade), 0.89) / np.sqrt(2)
        response += from_db(at_hz(echo_levels, hz)) * band(echoes, low, high)
    return signal.fftconvolve(x, response, axes=1)[:, :N]


def from_the_left(x):
    """Interaural differences: sound comes sooner to the left, and stronger over most of the range."""
    # level difference: f/Hz, left over right level/dB
    level_difference = [(150, -1.5), (600, 1.5), (1200, 4.5), (2100, 2.5), (6000, -1.5)]
    # phase by which the right side lags less, strongest in the middle range: f/Hz, phase/rad
    phase_bend = [(500, 0), (1000, 0.95), (1500, .85), (2000, 0.99), (2800, 0.36)]
    # time by which the left leads, apart from that phase: t/s, lead/s
    lead_course = [(0, 0.000015), (1.5, 0.00013), (3, 0.00019), (6.5, 0.00019), (8.2, 0.000099)]
    sides = np.array([[1], [-1]]) / 2

    def response(hz):
        return from_db(sides * at_hz(level_difference, hz)) * np.exp(-1j * sides * at_hz(phase_bend, hz))

    left, right = filtered(x, response)
    lead = np.interp(TIME, *np.transpose(lead_course))
    return np.array([left, np.interp(TIME - lead, TIME, right)])


def scene():
    """Superposition: case, hub, disc and hands, heard directly and through the room."""
    handling_room_db = -2
    snapping, sent = case_snaps() + hub_clicks()
    handling = latch_squeak() + scuffs() + freed_disc() + disc_drag() + fingers() + hands()
    echoes = room(from_db(handling_room_db) * handling + sent)
    return from_the_left(handling + snapping) + air_puff() + echoes + ambience()


def record(dry):
    """Band limiting and phase spreading: the left treble serves both sides; bass and top are cut."""
    # phase of the shared treble on the right: f/Hz, phase/turns
    treble_turns = [(6800, 0), (15800, 2)]
    shared_above_hz, low_cut_hz, cutoff_hz = 6300, 42, 16300

    def shared(hz):
        """Power crossfade: the fraction of the right channel taken from the left."""
        return np.clip((hz - shared_above_hz) / 400 + .5, 0, 1)

    def turned(hz):
        """Phase rotation: the shared part, turned by a frequency-dependent angle."""
        turns = np.interp(hz, *np.transpose(treble_turns))
        return np.sqrt(shared(hz)) * np.exp(2j * np.pi * turns)

    right = filtered(dry[1], lambda hz: np.sqrt(1 - shared(hz))) + filtered(dry[0], turned)
    low_cut = signal.butter(3, low_cut_hz, "high", fs=SR, output="sos")
    both = signal.sosfilt(low_cut, [dry[0], right])
    rounded = both / (1 + (both / .9) ** 8) ** (1 / 8)  # peaks saturate smoothly at 0.9
    return signal.sosfilt(signal.ellip(10, .2, 80, cutoff_hz, fs=SR, output="sos"), rounded)


dry = scene()
out = record(dry)
unload_wav(out)
```